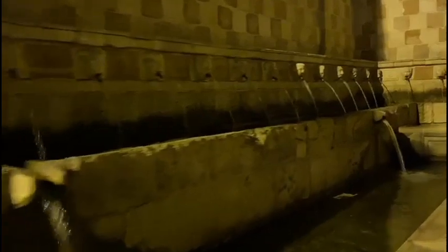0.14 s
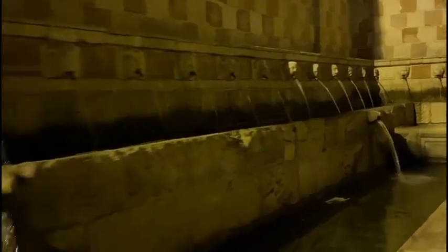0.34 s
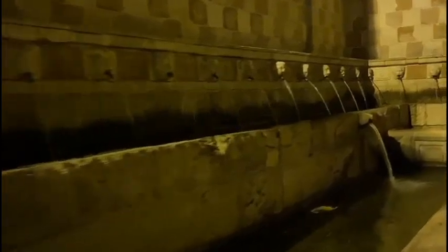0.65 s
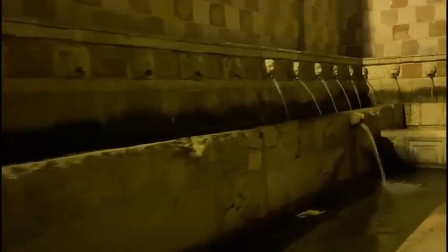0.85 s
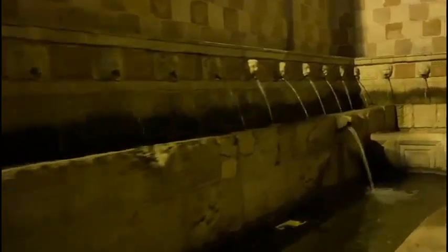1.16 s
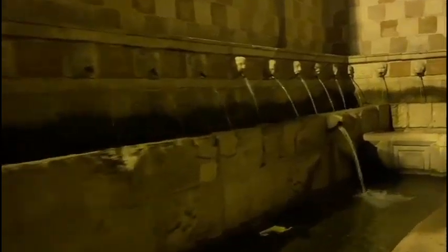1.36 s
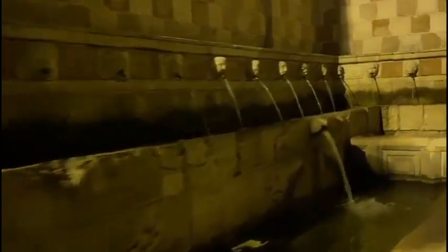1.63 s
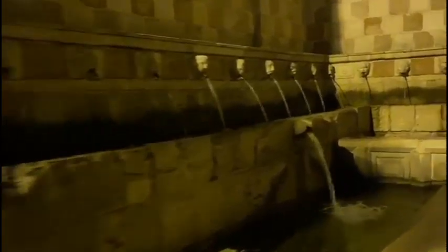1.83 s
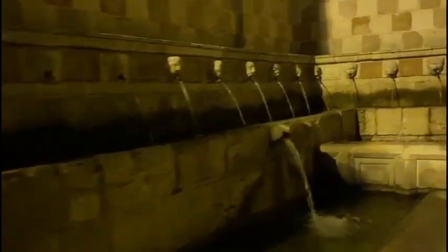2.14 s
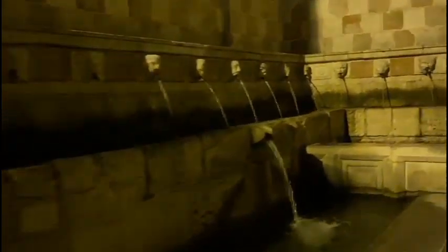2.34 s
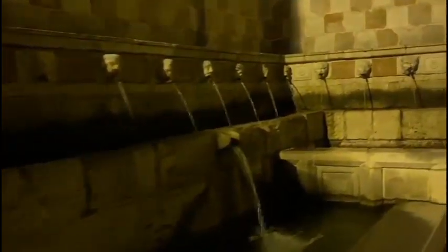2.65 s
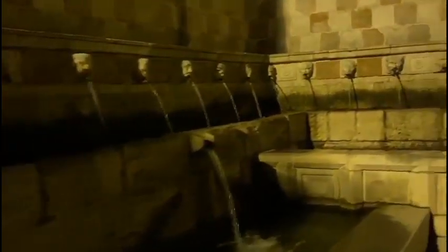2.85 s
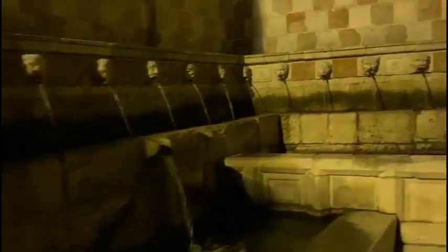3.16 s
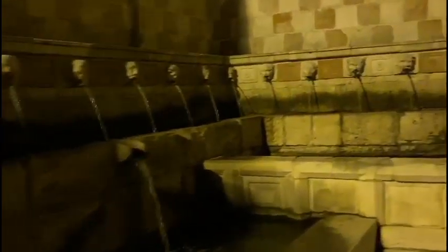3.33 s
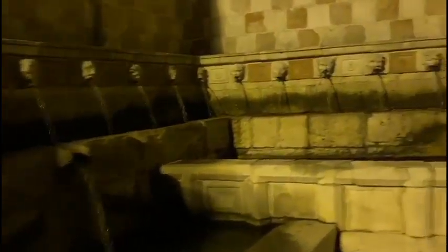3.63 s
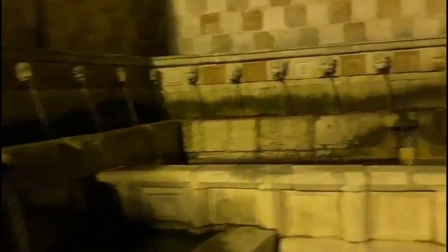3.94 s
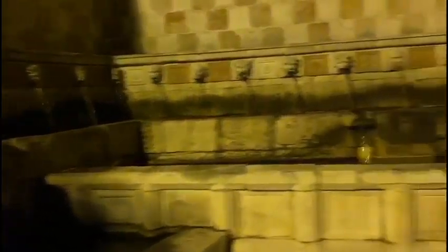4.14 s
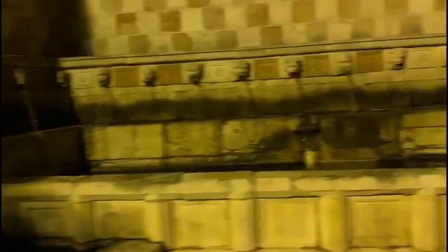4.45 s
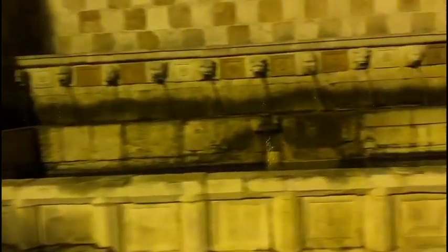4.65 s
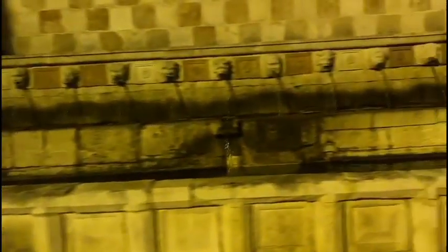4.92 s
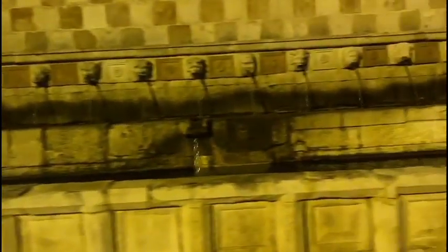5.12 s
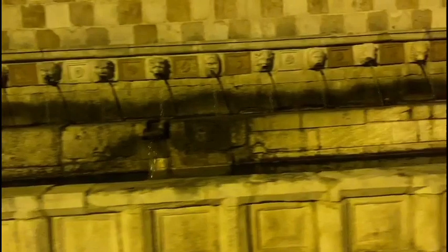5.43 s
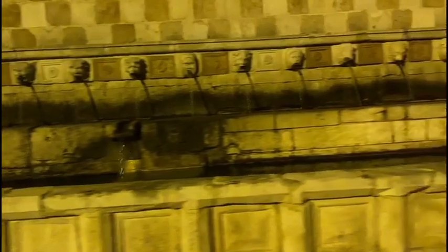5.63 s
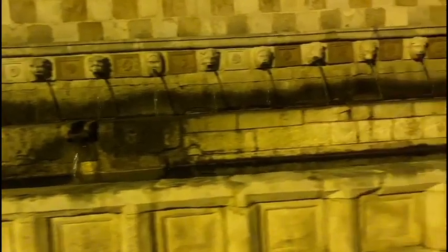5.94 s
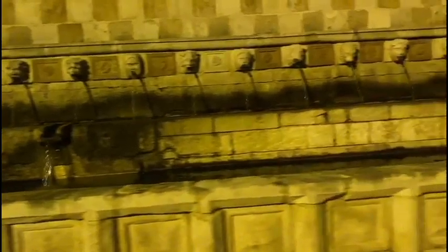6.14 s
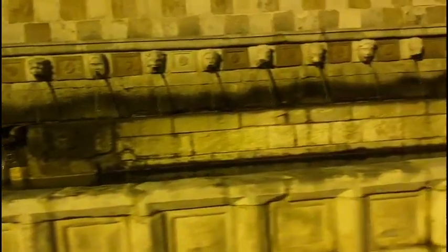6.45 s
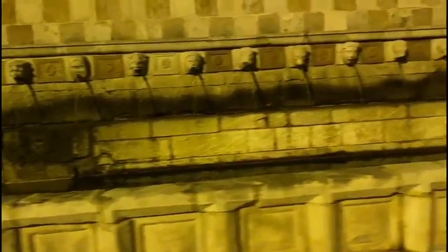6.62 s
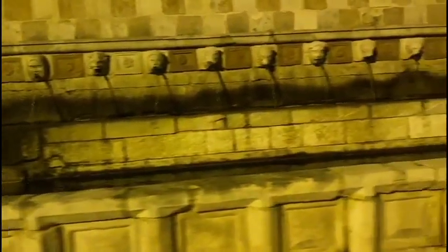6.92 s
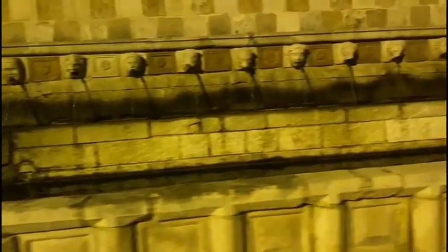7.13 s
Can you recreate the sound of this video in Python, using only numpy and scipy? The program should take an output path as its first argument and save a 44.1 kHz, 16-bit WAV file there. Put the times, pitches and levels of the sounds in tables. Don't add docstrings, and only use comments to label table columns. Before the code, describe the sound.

Many fountain spouts pour steadily into stone troughs, a broad bubbly wash with near plops, spray bursts and low wind buffeting the microphone.

```python
import sys
import numpy as np
from scipy import signal
from scipy.fft import rfft, irfft
from scipy.io import wavfile
from scipy.ndimage import uniform_filter1d

SR = 44100
rng = np.random.default_rng(int(sys.argv[2]) if len(sys.argv) > 2 else 0)


def wav_record(signal):
    frames = np.transpose(np.atleast_2d(signal))
    bounded = np.clip(frames, -1, 1)
    quanta = np.round(bounded * 32767).astype(np.int16)
    wavfile.write(sys.argv[1], SR, quanta)


def volts_from_decibels(level):
    exponent = np.asarray(level, float) / 20
    return 10 ** exponent


N = 321048

# start_s, level_db, facing [1] (how squarely the ports face the spray)
WATER_PAN = [(0.0, -34.5, -0.19), (0.5, -34.5, 0.94), (1.2, -34, -0.31), (2.0, -34.5, -0.3),
             (2.6, -34.5, 0.33), (3.4, -35, 0.094), (4.1, -35, -0.63), (4.8, -37, 0.8), (5.5, -37.5, 0.43),
             (6.2, -38, 0.38), (7.28, -38, 0.49)]
# freq_hz, level_db [dB per Hz]
MID_COLOUR = [(330, 0.5), (1200, -2.5), (1700, -2), (2600, -3), (4000, -10), (5200, -12.5), (5800, -14.5),
              (7400, -14.5), (8000, -20.5), (8400, -28), (9000, -18.5), (9600, -15), (11650, -17),
              (11950, -58)]
# freq_hz, level_db [dB per Hz]
SIDE_COLOUR = [(330, -2.5), (600, 0), (950, 1), (1500, 1.5), (2400, -8), (3400, -6), (4900, -15),
               (5750, -9.5), (6350, -21), (7250, -24), (7600, -14), (8200, -10.5), (9500, -14.5),
               (10300, -22)]
# freq_hz, in_phase [1], quarter_cycle [1]
SIDE_TIE = [(330, 0.0086, 0.2), (550, 0.33, 0.12), (1290, 0.22, 0.37), (1900, 0.34, -0.069),
            (2920, 0.3, 0.083), (4130, 0.39, -0.19), (5200, 0.42, 0.7), (6050, 0.28, -0.16),
            (7600, 0.043, -0.31), (7950, 0.14, 0.24), (8480, -0.44, 0.04), (9500, 0.07, 0.56),
            (10200, 0.02, 0.015)]
# peak_s, swell_db
SPRAY_BURSTS = [(0.249, 3), (0.407, 2), (0.802, 3), (1.282, 4), (1.349, 0.5), (1.58, 5), (1.765, 5.5),
                (2.076, 3), (2.187, 3), (2.762, 3.5), (2.831, 1), (3.878, 4), (4.021, 3), (4.08, 2.1),
                (4.358, 3.5), (4.452, 4.5), (4.537, 3.5), (4.603, 3), (5.722, 3), (5.923, 3), (6.198, 2.6),
                (6.253, 5), (6.927, 2.5), (7.061, 4)]
# start_s, peak_db
MIST_SPITS = [(0.0623, -34), (0.4618, -35), (0.5414, -33), (0.7058, -30), (0.7906, -27), (1.1044, -34),
              (1.3448, -24), (1.3674, -33), (1.4162, -33), (1.4874, -31), (1.5234, -32), (1.6916, -37),
              (1.8143, -32), (1.935, -31), (2.0138, -35), (2.2373, -40), (2.2847, -28), (2.5366, -37),
              (2.6668, -41), (3.2595, -32), (4.2168, -30), (4.6653, -26), (4.8025, -30), (5.0015, -32),
              (5.3253, -33), (7.0609, -32)]
# time_s, pitch_hz, strength [1]
HOLLOW_NOTE = [
    (0, 980, .6),
    (.6, 960, .7),
    (.9, 930, 1.7),
    (1.3, 960, .8),
    (1.7, 950, 1.1),
    (2.2, 900, .6),
    (2.6, 890, 0.27),
    (3.5, 950, 0.32),
    (5, 900, .2),
]
# freq_hz, width_hz, depth_db
ECHO_DIPS = [
    (726, 36, -1.5),
    (1223, 56, -0.5),
    (1650, 60, -1.5),
]
# centre_s, freq_hz, spread_s
BAND_LULLS = [(.8, 6050, .025), (.95, 6140, 0.035), (.96, 730, 0.023), (1.38, 1650, 0.022),
              (1.82, 1630, 0.014), (2.03, 1650, 0.029), (2.28, 1260, 0.043), (2.4, 740, 0.033),
              (2.6, 8350, 0.087), (2.9, 730, .025), (3.25, 8500, .09), (3.76, 1050, 0.024),
              (4.2, 8450, 0.14), (4.64, 1320, 0.018), (5.25, 5550, 0.023), (5.49, 1190, 0.017),
              (5.72, 1200, 0.022), (5.81, 1650, 0.032), (6.17, 4000, .025), (6.22, 1240, 0.027),
              (6.36, 1470, 0.027), (6.5, 1440, .02), (6.57, 1270, .015), (6.78, 2480, .015),
              (6.88, 1370, 0.024), (7.0, 1480, .025)]
# freq_hz, level_db [dB per Hz]
ROAR_COLOUR = [(53, -73), (90, -4.5), (166, 0), (275, -6.5), (353, -10.5), (400, -26), (520, -57),
               (880, -120)]
# time_s, level_db
GUSTS = [(0.0, -35.5), (0.35, -33.5), (0.55, -39.5), (1.1, -30.5), (1.44, -37), (1.86, -35.5),
         (2.27, -26.5), (2.86, -38), (2.96, -50), (3.1, -38), (3.7, -35), (4.4, -41), (4.72, -38.5),
         (5.21, -40.5), (5.54, -46), (5.88, -52), (6.18, -53), (7.28, -43.5)]
# freq_hz, level_db [dB per Hz]
RUMBLE_COLOUR = [(12, -44), (20, -57), (43, 3), (65, 3.5), (96, -2), (209, -22.5), (250, -19), (320, -25),
                 (550, -120)]
# centre_s, peak_db, pitch_hz, length_s
STRONG_EDDIES = [(0.272, -15.5, 64.4, 0.059), (0.408, -17.5, 99, 0.032), (0.511, -18.5, 83, 0.076),
                 (0.571, -16.5, 98, 0.027), (0.72, -14, 84, 0.019), (0.884, -19, 70.6, 0.025),
                 (0.961, -10, 108, 0.031), (1.02, -14, 85, 0.018), (1.061, -9.5, 68.5, 0.041),
                 (1.279, -17, 75, 0.017), (1.735, -15, 86, 0.011), (1.801, -10.5, 102, 0.013),
                 (1.875, -15.5, 112, 0.026), (2.123, -9, 80.5, 0.029), (2.243, -14.5, 79.4, 0.022),
                 (2.297, -14, 67.6, 0.025), (2.355, -8.5, 70, 0.025), (2.425, -12, 99, 0.026),
                 (2.569, -12, 90, 0.0095), (2.719, -18, 74.4, 0.012), (2.748, -16, 70, 0.024),
                 (3.305, -18.5, 90, 0.016), (3.501, -15.5, 68.6, 0.035), (3.633, -19, 102, 0.03),
                 (4.005, -15.5, 78, 0.05), (4.105, -17, 120, 0.021), (4.619, -20, 86, 0.046),
                 (4.816, -20, 84, 0.026), (5.208, -17, 97, 0.015), (5.939, -25.5, 83, 0.048)]
# centre_s, peak_db, pitch_hz, length_s
LESSER_EDDIES = [(0.063, -23, 107, 0.0085), (0.132, -23, 107, 0.012), (0.772, -19, 62, 0.035),
                 (0.869, -19, 71, 0.022), (1.115, -17, 67, 0.013), (1.168, -23, 67, 0.015),
                 (1.25, -19, 88, 0.014), (1.334, -25, 78, 0.025), (1.372, -17, 63, 0.014),
                 (1.491, -19, 107, 0.01), (1.649, -18, 87, 0.011), (1.704, -16.5, 73, 0.011),
                 (1.763, -16, 75, 0.016), (1.987, -20, 62, 0.019), (2.075, -20, 73, 0.014),
                 (2.201, -15, 76, 0.019), (2.272, -17, 96, 0.011), (2.456, -21, 80, 0.008),
                 (2.516, -9, 95, 0.011), (2.648, -26, 70, 0.022), (2.785, -19.5, 76, 0.014),
                 (2.84, -22, 90, 0.0063), (2.871, -27, 74, 0.02), (3.072, -24, 72, 0.025),
                 (3.115, -24, 70, 0.011), (3.161, -20, 116, 0.009), (3.205, -21, 98, 0.011),
                 (3.361, -29, 81, 0.015), (3.453, -26, 121, 0.012), (3.576, -21, 76, 0.017),
                 (3.664, -21, 109, 0.019), (3.744, -22, 120, 0.011), (3.804, -22, 79, 0.026),
                 (3.943, -26, 84, 0.012), (4.077, -16, 126, 0.008), (4.153, -28, 86, 0.009),
                 (4.256, -23, 81, 0.016), (4.32, -22, 90, 0.017), (4.578, -23, 118, 0.007),
                 (4.904, -25.5, 102, 0.012), (5.098, -28, 94, 0.006), (5.242, -22, 79, 0.017),
                 (5.283, -20, 103, 0.0073), (5.508, -27, 88, 0.02), (5.859, -25, 62, 0.053),
                 (6.519, -24, 82, 0.011), (6.954, -26, 122, 0.012), (7.146, -33, 111, 0.008)]
# centre_s, pitch_hz, left_db, right_db
LARGE_PLOPS = [(0.109, 2780, -14, -36), (0.197, 1820, -23, -36), (0.413, 990, -30, -13.5),
               (0.566, 1470, -16, -37), (0.735, 1070, -15, -38), (0.805, 3900, -13.5, -29),
               (0.833, 4460, -21, -30), (0.883, 914, -10, -12), (0.926, 4300, -20, -43),
               (0.988, 4700, -18, -29), (1.57, 870, -39, -13.5), (1.643, 2980, -17, -24),
               (1.75, 1106, -7.5, -13), (1.808, 2470, -20, -39), (2.214, 4651, -28, -25),
               (2.258, 2842, -18, -25), (2.487, 2500, -19, -19), (2.76, 1930, -15, -17),
               (3.135, 2640, -20, -23), (3.602, 1130, -15, -40), (3.628, 525, -18, -18),
               (3.879, 840, -18, -38), (4.194, 3000, -19, -43), (4.221, 3200, -21, -43),
               (4.627, 1010, -31, -18), (4.668, 1910, -16.5, -29), (5.272, 810, -20, -29),
               (5.502, 2670, -22, -21), (6.149, 2200, -18, -26), (6.504, 935, -16, -16)]
# centre_s, pitch_hz, left_db, right_db
LESSER_PLOPS = [(0.197, 3704, -27, -48), (0.247, 6202, -40, -41), (0.321, 4070, -29, -49),
                (0.409, 7000, -36, -36), (0.451, 5082, -31, -33), (0.726, 1620, -24, -43),
                (0.93, 5070, -35, -34), (0.952, 2740, -29, -31), (1.042, 1620, -33, -31),
                (1.133, 2650, -34, -44), (1.193, 7149, -40, -49), (1.348, 7500, -39, -42),
                (1.547, 6546, -39, -45), (1.573, 1800, -30, -27), (1.765, 6150, -37, -41),
                (1.795, 3618, -29, -33), (1.849, 7494, -42, -38), (2.074, 7063, -40, -48),
                (2.273, 5300, -35, -42), (2.487, 5082, -34, -33), (2.551, 603, -28, -33),
                (2.561, 7321, -38, -46), (2.57, 6115, -28, -41), (2.759, 7200, -36, -35),
                (2.759, 2900, -34, -29), (2.76, 4393, -35, -32), (2.788, 4048, -32, -45),
                (2.789, 5685, -36, -51), (3.397, 4000, -30, -45), (3.753, 5512, -26, -38),
                (3.802, 947, -36, -29), (3.902, 1723, -32, -35), (4.609, 4048, -32, -47),
                (5.01, 4737, -38, -50), (5.223, 5771, -44, -40), (5.499, 1820, -32, -29),
                (5.523, 3640, -39, -34), (5.611, 5771, -34, -44), (5.844, 7407, -42, -37),
                (6.104, 947, -34, -28.5), (6.142, 5168, -37, -37), (6.251, 6718, -41, -41),
                (6.413, 6288, -40, -50), (6.758, 6374, -41, -51), (6.95, 6891, -42, -54),
                (7.027, 1370, -23, -29), (7.062, 7407, -40, -35), (7.184, 5857, -36, -52)]
# freq_hz, depth_db
SURVIVAL = [(300, 38), (1000, 27), (3000, 20), (5300, 20.5), (7000, 13.5), (9000, 11), (11300, 13),
            (11800, -8)]
# freq_hz, gap_db
THINNING_GAP = [(300, 30), (600, 11), (1000, 10), (1500, 9), (2000, 9), (3000, 8), (4000, 6), (6000, 5),
                (7000, 5), (8400, 10.5), (9200, 4), (11000, 3)]


def evened(x):
    return x / np.sqrt(np.mean(abs(x) ** 2) + 1e-20)


def read(rows, at, log=True):
    x, *columns = np.transpose(rows)
    warp = np.log1p if log else np.asarray
    return np.array([np.interp(warp(at), warp(x), c) for c in columns])


def add(mix, s, sound):
    part = mix[max(round(s * SR), 0):][:len(sound)]
    part += sound[:len(part)]


def bell(x, centre, width):
    return np.exp(-.5 * ((x - centre) / width) ** 2)


def drift(t, slow_hz, fast_hz):
    rates = np.geomspace(slow_hz, fast_hz, 30)
    return evened(sum(np.sin(2 * np.pi * (f * t + rng.random())) / np.sqrt(f) for f in rates))


def blotches(shape, bands, frames):
    across = uniform_filter1d(rng.standard_normal(shape), bands, 0)
    return evened(uniform_filter1d(across, frames, 1))


def tinted(colour):
    hz = np.fft.rfftfreq(N, 1 / SR)
    return evened(irfft(rfft(rng.standard_normal((2, N))) * volts_from_decibels(read(colour, hz)[0]), N))


def bubble(hz, cycles, glide=.05):
    u = np.arange(round(4 * cycles / hz * SR)) * hz / SR / cycles
    shape = (1 - np.exp(-u / 0.096)) * np.exp(-u)
    return shape / shape.max() * np.sin(2 * np.pi * cycles * (u + glide * u ** 2))


def froth(per_s=5000, spread_db=2.0, cycles=8.0, share=0.2):
    swarm = np.zeros((2, N))
    pitches = np.geomspace(400, 11500, 20)
    for hz in pitches:
        count = round(per_s * hz / pitches.sum() * N / SR)
        births = np.zeros((2, N))
        sizes = volts_from_decibels(spread_db * np.minimum(rng.exponential(1, (2, count)), 3))
        np.put_along_axis(births, rng.integers(0, N, (2, count)), sizes, 1)
        ringing = signal.oaconvolve(births, bubble(hz, cycles)[None], axes=1)[:, :N]
        swarm += evened(ringing) * np.sqrt(hz)
    return np.sqrt(share) * evened(swarm) + np.sqrt(1 - share) * rng.standard_normal((2, N))


def passing_spouts(hz, t):
    gurgle_db, facing = read(WATER_PAN, t, log=False)
    far_db = -35 - gurgle_db
    rush_db = 0.11 * far_db + 1.2 * facing
    spray_db = 0.17 * far_db + 1.2 * facing
    gurgle, rush, spray = read(np.column_stack([(900, 3000, 9000), np.eye(3)]), hz)
    level_db = gurgle_db + rush * rush_db + spray * spray_db
    jet_db = -2.7 * bell(t, 2.4, .55)
    width_db = gurgle * 0.8 * far_db + rush * jet_db
    return level_db, width_db, facing


def hollow_trough(hz, t):
    hollow_hz, strength = read(HOLLOW_NOTE, t, log=False)
    nearness = np.clip((read(WATER_PAN, t, log=False)[0] + 37.5) / 5, .2, 1)
    return nearness * strength * 4.6 * bell(hz, hollow_hz, 100)


def spray_on_stone(hz, t, airy, flicker_db=0.42, splash_s=0.0079, spit_s=.006):
    bursts_db = sum(db * bell(t, s, splash_s) for s, db in SPRAY_BURSTS)
    spits_db = sum(max(db + 38.5, 0) * bell(t, s + .005, spit_s) for s, db in MIST_SPITS)
    return airy * (bursts_db + flicker_db * drift(t, 3, 40)) + spits_db / (1 + (9400 / (hz + 1)) ** 8)


def cancellation(hz, t):
    dips_db = sum(db * bell(hz, f, width) for f, width, db in ECHO_DIPS)
    for s, lull_hz, spread_s in BAND_LULLS:
        dips_db = dips_db - 10 * bell(hz, lull_hz, 49.5 + .035 * lull_hz) * bell(t, s, spread_s)
    return dips_db


def pouring(patchy_db=1.0, streaky_db=1.73, ragged_db=6.0):
    hz, t, (common, other) = signal.stft(froth(), SR, nperseg=512, noverlap=384)
    hz = hz[:, None]
    airy = np.clip(hz / 7000, .05, 1.2)
    level_db, width_db, facing = passing_spouts(hz, t)
    level_db = level_db + hollow_trough(hz, t) + spray_on_stone(hz, t, airy)
    lively = volts_from_decibels(level_db + patchy_db * blotches(common.shape, 8, 18))

    in_phase, quarter_cycle = read(SIDE_TIE, hz)
    tie = in_phase + 1j * quarter_cycle
    differing = tie * common + np.sqrt(np.clip(1 - abs(tie) ** 2, 0, 1)) * other
    inside = (hz > 200) * (hz < 11950) / (1 + (300 / (hz + 1)) ** 6)
    mid = common * lively * volts_from_decibels(read(MID_COLOUR, hz)[0] + 12.5) * inside
    side = differing * lively * volts_from_decibels(read(SIDE_COLOUR, hz)[0] + 11.5) * inside * (hz < 10320)

    wander = blotches(common.shape, 12, 50)
    streaks = evened(uniform_filter1d(rng.standard_normal((2, *common.shape)), size=16, axis=2))
    edge_db = np.clip((hz - 11400) / 400, 0, 1) * ragged_db * drift(t, 3.3, 20)
    notch_db = -1.9 * (1.55 - facing) * bell(hz, 8450, 420)
    narrow_dip_db = -9.9 * (abs(hz - 5490) < 110)
    mid = mid * volts_from_decibels(notch_db + streaky_db * streaks[0] + edge_db + cancellation(hz, t) - .8 * airy * wander)
    side = side * volts_from_decibels(streaky_db * streaks[1] + 1.4 * wander + narrow_dip_db + width_db)
    return signal.istft(np.array([mid + side, mid - side]), SR, nperseg=512, noverlap=384)[1][:, :N]


def roar(rel_db=-3.0, apart_db=-7):
    gurgle_db = read(WATER_PAN, np.arange(N) / SR, log=False)[0]
    mid, side = tinted(ROAR_COLOUR) * volts_from_decibels(gurgle_db + rel_db)
    side = volts_from_decibels(apart_db) * side
    return np.array([mid + side, mid - side])


def wind(apart_db=-14.5, lumpy_db=2.5, sag=0.64, stretch=1.48):
    t = np.arange(N) / SR
    mid, side = tinted(RUMBLE_COLOUR)
    level = volts_from_decibels(read(GUSTS, t, log=False)[0] - 0.3)
    mid = mid * level * volts_from_decibels(lumpy_db * drift(t, 3.2, 23))
    side = side * level * volts_from_decibels(apart_db + 2.0 + 1.6 * drift(t, 2, 20))
    lesser = np.array(LESSER_EDDIES) + [0, -1.0, 0, 0.0056]
    for s, db, pitch_hz, core_s in [*STRONG_EDDIES, *lesser]:
        phase, lean = rng.random(2)
        length_s = stretch * core_s
        u = np.linspace(-.5, .5, round(length_s * SR))
        turns = pitch_hz * length_s * (u - sag * u ** 2) + phase
        eddy = volts_from_decibels(db - 4.0) * np.cos(np.pi * u) ** 2 * np.sin(2 * np.pi * turns)
        add(mid, s - length_s / 2, eddy)
        add(side, s - length_s / 2 + 0.0035, volts_from_decibels(apart_db + 9.5) * (2 * lean - 1) * eddy)
    return np.array([mid + side, mid - side])


def near_bubbles(cycles=4.5, trim_db=-3.5, port_lag=18):
    out = np.zeros((2, N))
    lesser = np.array(LESSER_PLOPS) + [0, 0, 7.0, 7.0]
    for s, hz, left_db, right_db in [*LARGE_PLOPS, *lesser]:
        rings = cycles * np.sqrt(hz / 1000)
        start = s - 0.67 * rings / hz
        plop = volts_from_decibels(trim_db) * bubble(hz, rings, glide=0.012)
        add(out[0], start, volts_from_decibels(left_db) * plop)
        add(out[1], start + port_lag / SR, volts_from_decibels(right_db) * plop)
    return out


def coarse_partials(x, waver_db=4.0, dead=0.7, scraps_db=-3.0, block=1024, offset=207):
    n, k = np.arange(2 * block)[:, None] + .5, np.arange(block) + .5
    window = np.sin(np.pi * n / 2 / block)
    basis = window * np.cos(np.pi / block * (n + block / 2) * k) * np.sqrt(2 / block)
    lead, count = 2 * block - offset, N // block + 4
    pair = np.array([x[0] + x[1], x[0] - x[1]]) / 2
    pair = np.pad(pair, ((0, 0), (lead, (count + 1) * block - lead - N)))
    halves = pair.reshape(2, -1, block)
    lines = np.concatenate([halves[:, :-1], halves[:, 1:]], 2) @ basis
    near = uniform_filter1d(uniform_filter1d(lines ** 2, size=9, axis=2), size=2, axis=1) ** .5
    loud = uniform_filter1d(near.max(0), size=60, axis=1) + 1e-9
    hz = k * SR / 2 / block
    waver = uniform_filter1d(rng.standard_normal((count, block // 16)), size=3, axis=0).repeat(16, 1)
    mood = uniform_filter1d(rng.standard_normal((count, block // 8)), size=2, axis=0).repeat(8, 1)
    weak = near < near[::-1] * volts_from_decibels(5 * mood - read(THINNING_GAP, hz)[0])
    weak |= (waver > 1.05) * (hz > 3300) * (near < loud)
    depth_db = np.where(weak, scraps_db, -read(SURVIVAL, hz)[0])
    step = loud * volts_from_decibels(waver_db * waver + depth_db) / dead
    rounded = step * np.sign(lines) * np.floor(abs(lines) / step + 1 - dead)
    back = rounded @ basis.T
    joined = (back[:, 1:, :block] + back[:, :-1, block:]).reshape(2, -1)
    mid, side = joined[:, lead - block:][:, :N]
    return np.array([mid + side, mid - side])


def scene():
    return pouring() + roar() + wind() + near_bubbles()


def roll_off(x):
    return signal.sosfilt(signal.butter(12, 12230, fs=SR, output="sos"), x)


def record(dry):
    low_cut = signal.butter(2, 25, "high", fs=SR, output="sos")
    mix = coarse_partials(signal.sosfilt(low_cut, dry))
    return roll_off(mix)


dry = scene()
out = record(dry)
wav_record(out)
```